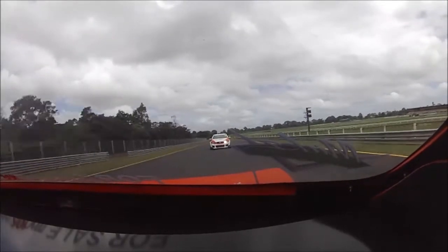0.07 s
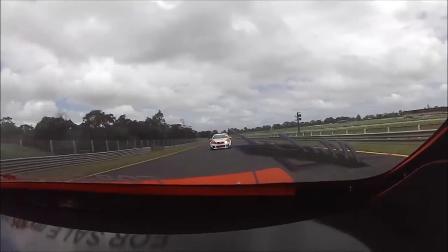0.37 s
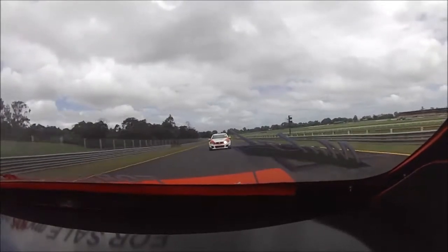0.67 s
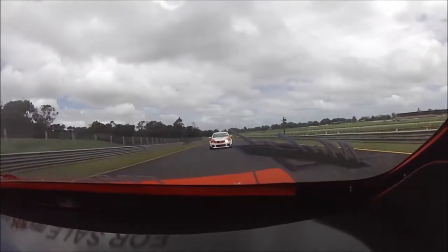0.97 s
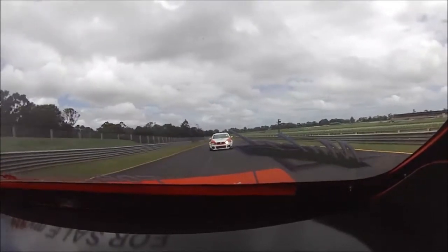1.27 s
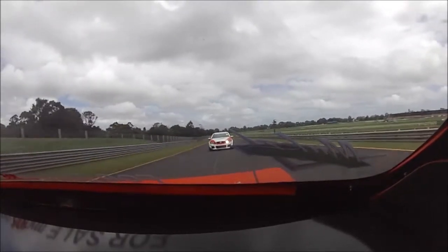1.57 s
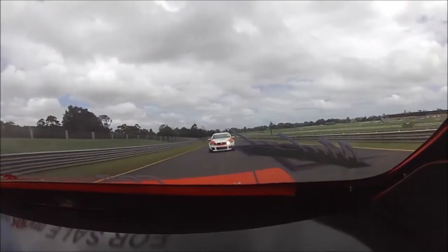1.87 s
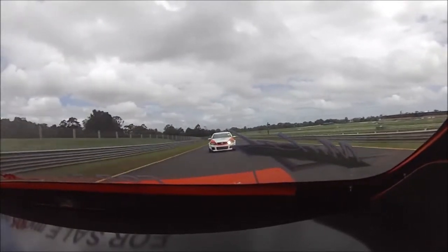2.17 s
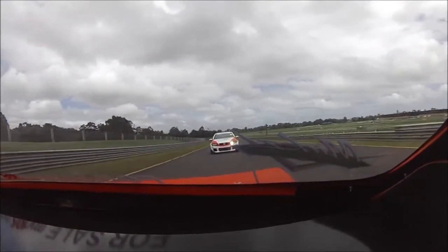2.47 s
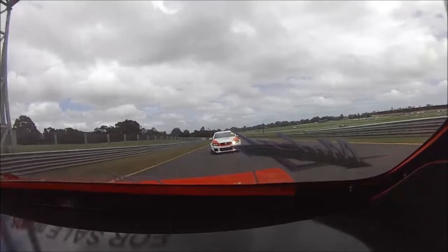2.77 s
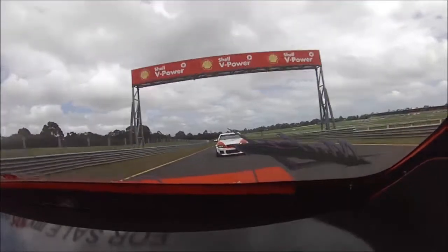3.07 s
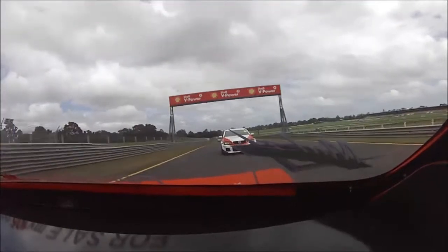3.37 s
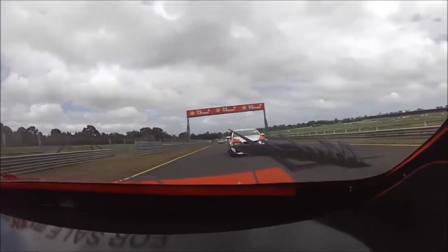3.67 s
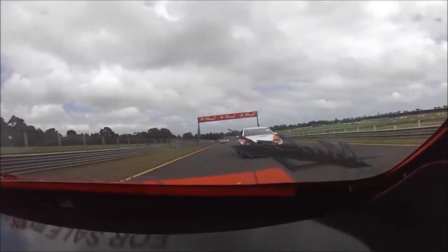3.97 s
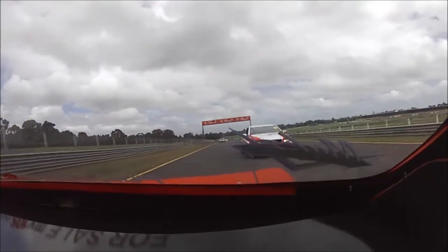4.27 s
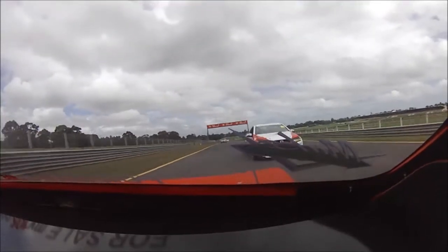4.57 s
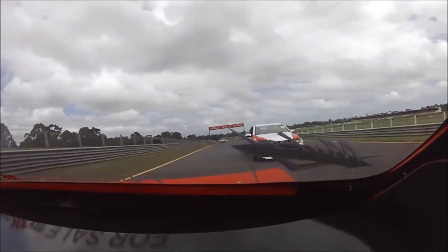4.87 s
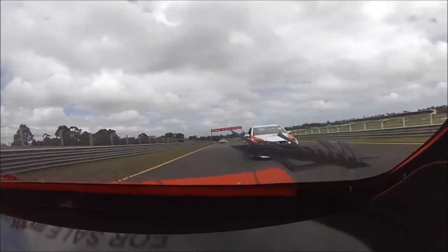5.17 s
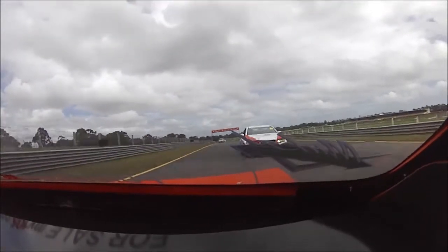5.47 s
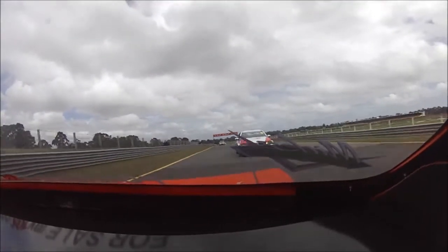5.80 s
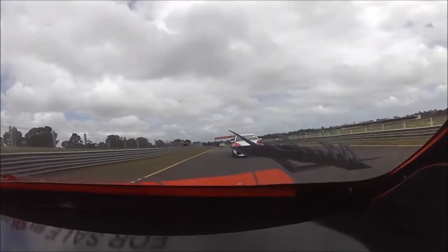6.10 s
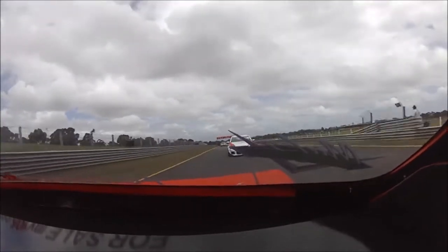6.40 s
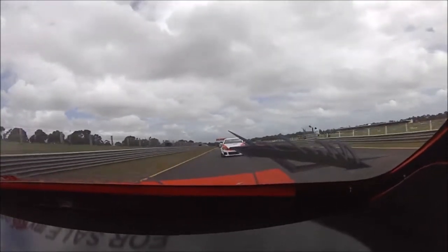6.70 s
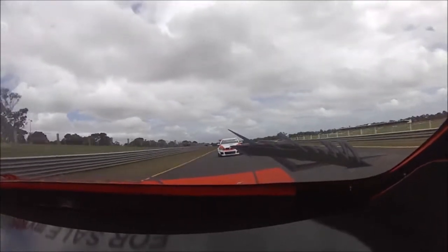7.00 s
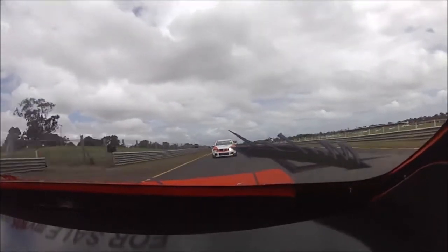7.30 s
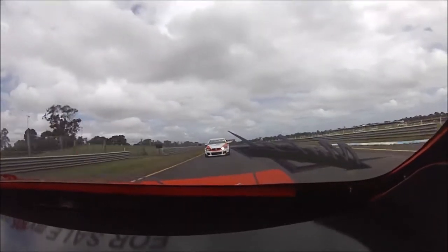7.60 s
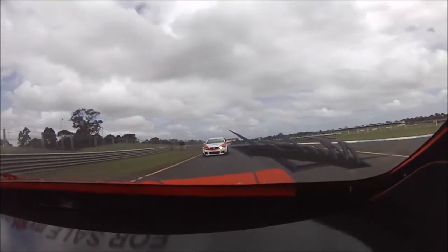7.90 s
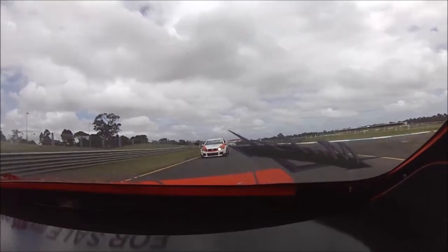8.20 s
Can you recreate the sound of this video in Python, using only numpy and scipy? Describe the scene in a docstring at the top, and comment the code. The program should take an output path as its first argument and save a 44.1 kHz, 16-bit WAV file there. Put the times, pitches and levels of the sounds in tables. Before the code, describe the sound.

A race car engine drones loudly at full throttle, heard from inside the cabin on a track. It shifts up with a clunk almost at once, then pulls steadily with high gear whine, rattle and hiss over wind and road rumble. A stone knocks on the floor. Later the throttle shuts: the engine slows, the exhaust burbles and the gears chatter, with one quick downshift blip before it coasts on.

```python
"""Inside a five-cylinder race car at full throttle: exhaust drone from the firings, whine from the
meshing straight-cut gears, casing rattle, hiss, wind and road rumble. At 0.5 s it shifts up with a
clunk and pulls for five seconds; a stone knocks on the floor pan at 1.9 s. At 5.8 s it lifts off:
the engine slows, unburnt fuel burbles and the gears chatter in their backlash.
At 7.4 s one throttle blip takes it down a gear, and it coasts on."""
import sys
import numpy as np
from scipy import signal
from scipy.fft import rfft, irfft, next_fast_len
from scipy.io import wavfile

SR = 44100
rng = np.random.default_rng(int(sys.argv[2]) if len(sys.argv) > 2 else 0)


def inscribe(sig):
    """Save sig as 16-bit PCM at rate SR to the path in sys.argv[1].

    A 1-D sig is mono; a 2-D sig holds one channel per row.
    Samples are clipped to [-1, 1] before scaling.
    """
    pcm = np.round(np.clip(np.atleast_2d(sig).T, -1, 1) * 32767)
    wavfile.write(sys.argv[1], SR, pcm.astype(np.int16))


N = 363825
TIME = np.arange(N) / SR

FIRINGS, BOOM_ORDER, MESH_ORDER = 5, 8, 60  # per four-stroke cycle
PEDAL_TRAVEL_S = .04
# throttle presses, two gears and the blip: (opens [s], shuts [s])
THROTTLE_PRESSES = [(-.1, .485), (.555, 5.795), (7.375, 7.44)]


def engine_speed():
    """Four-stroke cycle rate [Hz]; after the lift the drive line winds and unwinds, rocking it."""
    # engine speed: (time [s], cycle rate [Hz])
    speed_curve = [(0, 51), (.23, 51.45), (.46, 51.4), (.49, 49.5), (.55, 44.6), (.8, 44.15), (1.1, 44.3),
                   (1.5, 44.7), (3.6, 46.35), (4.15, 46.5), (5.76, 47.68), (5.93, 45.2), (6.03, 43.1),
                   (6.2, 43.4), (6.93, 38.8), (7.13, 36.5), (7.26, 36.1), (7.33, 38.5), (7.41, 46.3),
                   (7.49, 41.8), (7.65, 39.7), (7.78, 41.4), (8, 39.3), (8.25, 38.3)]
    surge_start_s, surge_end_s, surge_hz, depth_hz = 5.99, 7.24, 3.6, .6
    age_s = np.clip(TIME, surge_start_s, surge_end_s) - surge_start_s
    return lookup(TIME, speed_curve) - depth_hz * np.sin(2 * np.pi * surge_hz * age_s)


def pedal():
    """Throttle opening 0-1, ramped by the pedal's travel."""
    return sum(np.clip(.5 + np.minimum(TIME - opens_s, shuts_s - TIME) / PEDAL_TRAVEL_S, 0, 1)
               for opens_s, shuts_s in THROTTLE_PRESSES)


def by_load(levels, cycle_hz, throttle):
    """Gain from levels [dB] at five open-throttle and two shut-throttle speeds."""
    open_db = np.interp(cycle_hz, (44.3, 45, 46, 47.6, 51.3), levels[0])
    shut_db = np.interp(cycle_hz, (36, 44), levels[1])
    return from_db(throttle * open_db + (1 - throttle) * shut_db)


def exhaust(cycles, cycle_hz, throttle):
    """Firing tone, boom and weaker orders, over gas noise that puffs at each firing."""
    # firing tone by speed: (open levels [dB], shut levels [dB])
    firing_levels = (-23, -22.5, -19.5, -18.5, -16), (-28, -24)
    # boom by speed: (open levels [dB], shut levels [dB])
    boom_levels = (-31.5, -24.5, -20, -18, -21.8), (-67, -37)
    # roar by speed: (open levels [dB], shut levels [dB])
    roar_levels = (-30.5, -31, -30.5, -28.5, -30.5), (-43.5, -36.5)
    # gas noise spectrum: (frequency [Hz], relative density [dB])
    gas_spectrum = [(90, -7), (160, -1.5), (290, 8.5), (420, 8.5), (620, 0), (800, 0.5), (1000, -5.5),
                    (1220, -4), (1500, -8.5), (2500, -16.5), (3300, -48), (4500, -46)]
    # unburnt fuel in the pipe, throttle shut: (time [s], boom level [dB], half length [s])
    burbles = [(5.88, -23, 0.032), (6.213, -32, 0.071), (6.463, -34, 0.032), (7.567, -27, 0.025),
               (7.776, -30.5, 0.075)]
    burble = sum(from_db(db) * bell(at_s, half_s) for at_s, db, half_s in burbles)
    firing = partial(cycles, FIRINGS, flutter_db=0.5, flutter_hz=5.2)
    firing *= by_load(firing_levels, cycle_hz, throttle)
    firing *= from_db(1.15 * (1 - throttle) * drift(22))  # less steady when shut
    boom = partial(cycles, BOOM_ORDER, flutter_db=1.4, flutter_hz=28)
    boom *= by_load(boom_levels, cycle_hz, throttle) + burble
    puffs = rms_one(from_db(2.6 * np.cos(2 * np.pi * FIRINGS * cycles)) * gritty(spread_db=2.0))
    gas = colour(puffs, gas_spectrum, band_hz=(520, 1700))
    roar = from_db(0.1) * weak_orders(cycles, cycle_hz, throttle) + from_db(-2.0) * gas
    roar_gain = np.hypot(by_load(roar_levels, cycle_hz, throttle), from_db(-12.5) * burble)
    return torque_cut() * (firing + boom) + roar_gain * roar


def weak_orders(cycles, cycle_hz, throttle):
    """Uneven cylinders add orders that swell as the revs carry them through resonances."""
    # order envelope, throttle open: (frequency [Hz], level re roar [dB])
    open_orders = [(130, -14), (400, -15), (650, -22.5), (1500, -32)]
    # pipe and cabin resonances: (centre [Hz], width [Hz], boost [dB])
    cabin_modes = [(151, 29, 13.5), (400, 57, 13.5), (497, 44, 11), (608, 33, 10.5), (745, 46, 6.5),
                   (800, 64, 12), (876, 31, 9.5), (976, 55, 11.5), (1122.4, 15.5, 13), (1183, 100, 13.5)]
    # order envelope, throttle shut: (order [per cycle], level re roar [dB])
    shut_orders = [(3, -1), (4, 3), (6, 4.5), (9, -1.5), (11, -8), (13, -16), (30, -26)]
    hz = np.arange(100, 1700)
    response_db = lookup(hz, open_orders) + resonance_db(hz, cabin_modes)
    out = 0
    for order in range(3, 30):
        if order not in (FIRINGS, BOOM_ORDER):
            boost_db = 3 * (order % FIRINGS == 1)  # just above each firing harmonic
            open_db = np.interp(order * cycle_hz, hz, response_db) + boost_db
            db = throttle * open_db + (1 - throttle) * lookup(order, shut_orders)
            out += from_db(db) * partial(cycles, order, flutter_db=1.5, flutter_hz=6.4)
    return out


def torque_cut():
    """Share of the firing left; it all but stops at the upshift and in sharp rev drops."""
    # firing cuts: (time [s], half length [s], depth [0-1])
    cuts = [(0.533, 0.01, 1), (5.833, 0.024, .85), (6.045, 0.04, 0.75), (7.483, 0.029, .85)]
    return 1 - np.clip(sum(depth * bell(at_s, half_s) for at_s, half_s, depth in cuts), 0, 1)


def drive_whine(cycles, cycle_hz, drive):
    """Loaded teeth whine at the mesh rate and rasp as they slide; shaft wobble adds side tones."""
    # mesh tone under drive: (time [s], relative level [dB])
    whine_curve = [(0, -34.5), (.25, -38), (.55, -40.5), (.64, -26.5), (.73, -33.5), (.85, -23),
                   (1.46, -21), (1.6, -29.5), (1.73, -30), (1.88, -35), (2.2, -35), (2.5, -26.5),
                   (3, -29.5), (3.2, -31), (3.55, -28), (3.8, -35.5), (4.35, -26), (5, -23.5), (5.15, -27),
                   (5.47, -24), (5.62, -31.5), (5.78, -30.5)]
    # gear train response: (cycle rate [Hz], shaft wobble [0-1], overtone gain [dB])
    gear_response = [(44.2, .1, -1), (44.6, .1, 1), (45.3, .45, 1), (45.9, .45, -4), (46.35, .8, 1),
                     (46.7, .3, -2), (47.3, .22, -3), (47.6, .4, -6), (51, .12, -8)]
    # sliding teeth: (frequency [Hz], relative density [dB])
    rasp_spectrum = [(1900, -36), (2450, -13), (2700, -0.5), (3050, -2.5), (3300, -13), (3800, -14)]
    whine_db = lookup(TIME, whine_curve)
    wobble = lookup(cycle_hz, gear_response)
    overtone_db = lookup(cycle_hz, gear_response, column=2)
    mesh = MESH_ORDER * cycles + .04 * drift(20)
    shaft = np.sin(2 * np.pi * 2.5 * cycles + .4 * drift(4))
    side_tones = np.sqrt(2) * np.cos(2 * np.pi * mesh) * (1.15 * shaft + .45 * drift(70))
    tone = partial(mesh, order=1, flutter_db=1.0, flutter_hz=20)
    tone = (tone + wobble * side_tones) / np.sqrt(1 + wobble ** 2)
    # tooth load fluctuates, least where the whine is loud and the teeth sit firmly
    stutter = np.interp(whine_db, (-34, -22), (.5, .28))
    tone *= rms_one(np.clip(1 + stutter * drift(22), .2, 1.5))
    overtones = sum(from_db(db) * partial(mesh + .008 * drift(60), order, flutter_db=3.5, flutter_hz=30)
                    for order, db in enumerate([-52, -61.5, -72], 2))
    sliding = gritty(spread_db=3.0) * from_db(2.8 * drift(32))
    rasp = colour(sliding, rasp_spectrum, band_hz=(2450, 3300))
    rasp *= from_db(np.interp(cycle_hz, (44.2, 46, 47.5, 51), [-42, -38.5, -37, -47]))
    return drive * (from_db(whine_db - 0.5) * tone + from_db(overtone_db - 0.3) * overtones + rasp)


def coast_contact():
    """Pressure of unloaded teeth on their coast flanks: bounces, each on a lighter, longer touch."""
    # bounce runs: (first [s], last [s], rate [Hz], first and last relative level [dB], touch [dB])
    bounce_runs = [(6.193, 6.53, 14.9, -47.5, -44.5, -13), (6.597, 6.752, 21, -44, -40.5, -10),
                   (6.835, 7.3, 15.05, -40, -42.5, -18), (7.61, 8.23, 12.9, -45, -49, -3)]
    half_s, jitter_s, spread_db = 0.016, 0.0046, 2.3
    out = np.zeros(N)
    for first_s, last_s, rate_hz, first_db, last_db, touch_db in bounce_runs:
        for k, (late, louder) in enumerate(rng.standard_normal((24, 2))):
            at_s = first_s + k / rate_hz
            if at_s < last_s + .5 / rate_hz:
                db = np.interp(at_s, (first_s, last_s), (first_db, last_db)) + spread_db * louder
                at_s += jitter_s * late
                touch = from_db(touch_db) * bell(at_s, 2.3 * half_s)
                out += from_db(db - 7.5) * (bell(at_s, half_s) + touch)
    return out


def coast_whine(cycles, throttle, contact):
    """On the coast flanks the mesh sounds mainly an octave up; the final drive moans below it."""
    mesh = MESH_ORDER * cycles + .085 * drift(80)
    chirps = sum(from_db(db) * partial(mesh, order, flutter_db=2.5, flutter_hz=60)
                 for order, db in enumerate([-14, 0, -17, -28], 1))
    moan = partial(cycles + .012 * drift(20), order=23.8, flutter_db=2.5, flutter_hz=14)
    return from_db(.3) * contact * chirps + (1 - throttle) * from_db(-51.5) * moan


def backlash():
    """Envelope of the drive line's slaps: sharp rise, exponential decay."""
    # backlash slaps and shift clunks: (time [s], level [dB], decay [s])
    slaps = [(0.487, -28.5, 0.013), (5.845, -36.5, 0.017), (5.933, -35.5, 0.027), (6.049, -32.5, 0.017),
             (6.112, -39.5, 0.021), (6.38, -45, 0.012), (7.334, -32, 0.025), (7.387, -39.5, 0.05),
             (7.503, -41.5, 0.025), (8.039, -45, 0.02)]
    rise_s = 0.004
    out = np.zeros(N)
    for at_s, db, decay_s in slaps:
        age_s = np.maximum(TIME - at_s, 0)
        out += from_db(db) * (1 - np.exp(-age_s / rise_s)) * np.exp(-age_s / decay_s)
    return out


def clatter(cycles, cycle_hz, drive, contact, slaps):
    """Valve gear, bouncing teeth and slaps rattle the casing; its upper modes speak mainly under load."""
    # valve gear by speed: (open levels [dB], shut levels [dB])
    valve_levels = (-36.5, -36, -37, -35.5, -39.5), (-48.5, -45.5)
    # rattle spectrum: (frequency [Hz], relative density [dB])
    rattle_spectrum = [(700, -8), (1500, -4.5), (2400, -6.5), (2700, -6), (3050, -2.5), (3400, -14.5),
                       (4000, -18), (4750, -13.5), (5300, -15.5), (7000, -24.5), (12000, -41.5)]
    # gearbox casing resonances: (centre [Hz], width [Hz], boost [dB])
    casing_modes = [(1811, 36, 10.5), (2143, 176, 13), (2630, 56, 10), (2815, 180, 12)]
    # casing's main ring, struck by the teeth: (frequency [Hz], relative density [dB])
    ring_spectrum = [(1700, -22), (2030, -19), (2160, -2), (2300, -12), (2700, -20)]
    band_hz = (1900, 2450)
    beat = rms_one(from_db(1.9 * np.cos(2 * np.pi * FIRINGS * cycles) + 0.6 * drift(25)))
    valves = from_db(-1.5) * by_load(valve_levels, cycle_hz, drive) * beat
    rattle = (valves + slaps) * gritty(spread_db=3.0)
    loaded_share = drive + (1 - drive) * 0.43
    loaded = colour(loaded_share * rattle, rattle_spectrum, band_hz, casing_modes)
    loose = colour((1 - loaded_share) * rattle, rattle_spectrum, band_hz, casing_modes[:2])
    strikes = (contact + from_db(-5) * slaps) * gritty(spread_db=2.5)
    return loaded + loose + from_db(5.0) * colour(strikes, ring_spectrum, band_hz)


def stone_knock():
    """A stone strikes the heavily damped floor pan."""
    # stone impact: (time [s], level [dB])
    impacts = [(1.8755, -7)]
    # floor pan modes: (frequency [Hz], relative level [dB], decay [s])
    pan_modes = [(564, 0.5, .0016), (1100, -4.5, 0.00081), (2000, -27, .0005), (3180, -28, 0.00035)]
    out = np.zeros(N)
    for at_s, db in impacts:
        age_s = np.maximum(TIME - at_s, 0)
        for hz, mode_db, decay_s in pan_modes:
            out += from_db(db + mode_db) * np.sin(2 * np.pi * hz * age_s) * np.exp(-age_s / decay_s)
    return out


def wind_and_road():
    """Buffeting and tyres shake the body."""
    # rumble strength: (time [s], relative level [dB])
    rumble_curve = [(0, -32), (.35, -38.5), (1.1, -36), (1.8, -26.5), (2.15, -33), (5.2, -31), (6.2, -31),
                    (7.2, -39.5), (7.6, -32.5), (8.25, -37)]
    # rumble spectrum: (frequency [Hz], relative density [dB])
    rumble_spectrum = [(15, -30), (30, -12), (48, -6.5), (68, 2), (130, 3.5), (190, 6), (300, 3),
                       (600, -17.5), (1500, -58)]
    gusts = rms_one(from_db(1.4 * drift(12.0) + 0.8 * drift(5.3)))
    rumble = colour(rng.standard_normal(N) * gusts, rumble_spectrum, band_hz=(40, 135))
    return from_db(lookup(TIME, rumble_curve) - 2.5) * rumble


def hiss_and_grit(cycle_hz, throttle, contact, slaps):
    """Bright hiss rises with engine effort and each jolt; grit ticks against the body."""
    # hiss by speed: (open levels [dB], shut levels [dB])
    hiss_levels = (-64.5, -65.5, -63.5, -61, -63.5), (-72.5, -66.5)
    # hiss spectrum: (frequency [Hz], relative density [dB])
    hiss_spectrum = [(2000, 13), (3800, -4.5), (5800, -4), (7000, -1.5), (9000, -2.5), (12000, -5.5),
                     (15400, -13.5)]
    # larger grit hits: (time [s], relative level [dB])
    grit_hits = [(5.846, -33), (5.9265, -40), (6.0707, -47), (6.5217, -43), (6.6544, -42), (6.9108, -40),
                 (7.3523, -39), (7.5249, -40), (8.2128, -51)]
    grit_per_s, tick_decay_s = 45, 0.0042
    jolts = from_db(-23.5) * slaps + from_db(-34) * contact
    gain = np.hypot(by_load(hiss_levels, cycle_hz, throttle), jolts)
    grit = (rng.random(N) < grit_per_s / SR) * rng.standard_normal(N)
    hiss = gain * (gritty(spread_db=2.0) * from_db(2.5 * drift(60)) + from_db(12) * grit)
    tick_envelope = sum(from_db(db) * (TIME >= at_s) * np.exp(-abs(TIME - at_s) / tick_decay_s)
                        for at_s, db in grit_hits)
    ticks = from_db(-13.0) * tick_envelope * rng.standard_normal(N)
    return colour(hiss + ticks, hiss_spectrum, band_hz=(6300, 7600))


def from_db(db):
    """Decibels to gain."""
    return 10 ** (np.asarray(db) / 20)


def rms_one(x):
    """Scale to unit power."""
    return x / np.sqrt(np.mean(x ** 2) + 1e-20)


def lookup(x, rows, column=1):
    """Interpolate a table column against the first."""
    columns = np.transpose(rows)
    return np.interp(x, columns[0], columns[column])


def bell(at_s, half_s):
    """Gaussian swell of height 1."""
    return np.exp(-((TIME - at_s) / half_s) ** 2)


def drift(rate_hz):
    """Random wander, low-passed at rate_hz; rms near 1."""
    hop, settle = 40, 2000
    pole = np.exp(-2 * np.pi * rate_hz * hop / SR)
    noise = rng.standard_normal(N // hop + settle + 2)
    slow = signal.lfilter([1], [1, -2 * pole, pole * pole], noise)[settle:]
    return np.interp(np.arange(N) / hop, np.arange(len(slow)), rms_one(slow))


def partial(cycles, order, flutter_db, flutter_hz):
    """Sine at a multiple of the cycle rate, fluttering in level; rms near 1."""
    wave = np.sqrt(2) * np.sin(2 * np.pi * (order * cycles + rng.random()))
    return wave * rms_one(from_db(flutter_db * drift(flutter_hz)))


def gritty(spread_db):
    """Noise with a fast, uneven level, like dense impacts; rms 1."""
    return rms_one(rng.standard_normal(N) * from_db(spread_db * drift(210)))


def resonance_db(hz, modes):
    """Summed boost of resonance peaks."""
    return sum(db / (1 + (2 * (hz - centre_hz) / width_hz) ** 2) for centre_hz, width_hz, db in modes)


def colour(x, spectrum, band_hz, modes=()):
    """Filter by a spectrum and resonances; unit white noise leaves with unit power inside band_hz."""
    size = next_fast_len(N)
    hz = np.maximum(np.fft.rfftfreq(size, 1 / SR), 1)
    points_hz, points_db = np.transpose(spectrum)
    gain = from_db(np.interp(np.log(hz), np.log(points_hz), points_db) + resonance_db(hz, modes))
    if points_hz[-1] < SR / 4:
        gain /= 1 + (hz / points_hz[-1]) ** 8  # roll off past the last point
    inside = (hz > band_hz[0]) & (hz < band_hz[1])
    gain /= np.sqrt(np.mean(gain ** 2 * inside))
    return irfft(rfft(x, size) * gain, size)[:N]


def scene():
    """Engine speed sets the pitches, throttle the load; mono mix."""
    cycle_hz, throttle = engine_speed(), pedal()
    blip_s = THROTTLE_PRESSES[-1][0]
    drive = throttle * (TIME < blip_s - PEDAL_TRAVEL_S)  # clutch down in the blip: no tooth load
    unevenness = 0.00033 + 0.00298 * (1 - throttle)  # the unloaded crank runs less evenly
    cycles = np.cumsum(cycle_hz * (1 + unevenness * drift(14.3))) / SR
    contact, slaps = coast_contact(), backlash()
    gearbox = drive_whine(cycles, cycle_hz, drive) + coast_whine(cycles, throttle, contact)
    gearbox += clatter(cycles, cycle_hz, drive, contact, slaps)
    mix = exhaust(cycles, cycle_hz, throttle) + gearbox + stone_knock() + wind_and_road()
    mix += hiss_and_grit(cycle_hz, throttle, contact, slaps)
    return mix[None]


def record(dry):
    """Steep elliptic low-pass."""
    cutoff_hz = 15400
    return signal.sosfilt(signal.ellip(12, .1, 90, cutoff_hz, fs=SR, output="sos"), dry)


dry = scene()
out = record(dry)
inscribe(out)
```